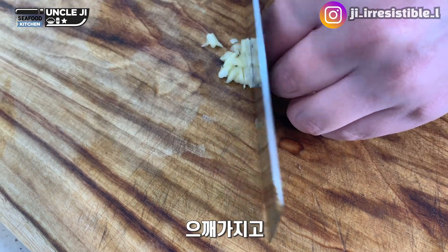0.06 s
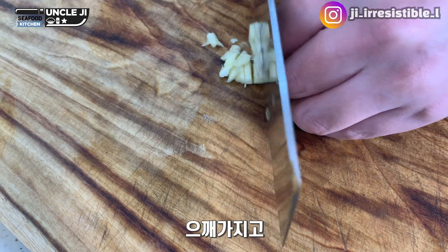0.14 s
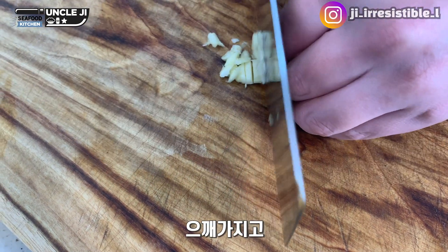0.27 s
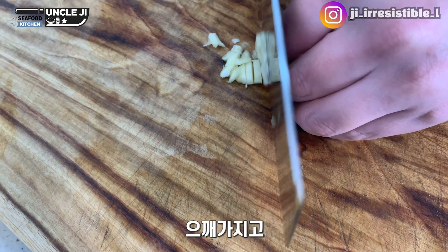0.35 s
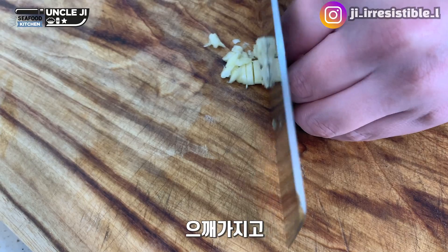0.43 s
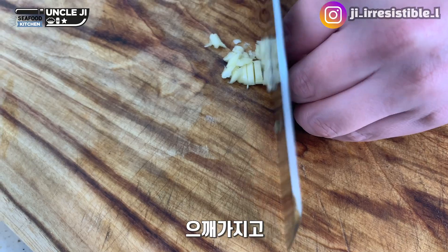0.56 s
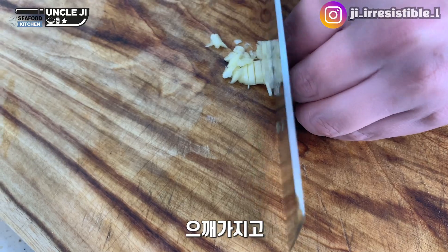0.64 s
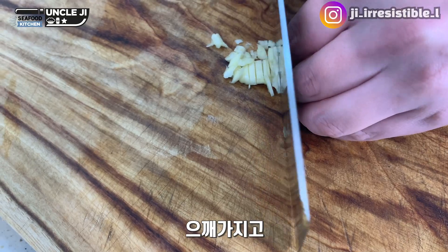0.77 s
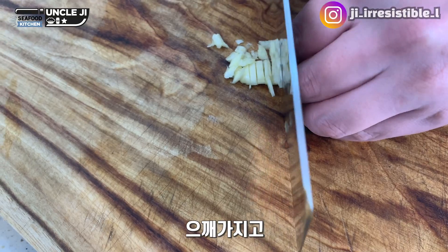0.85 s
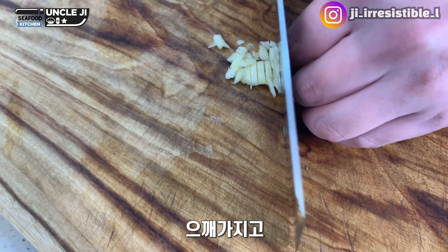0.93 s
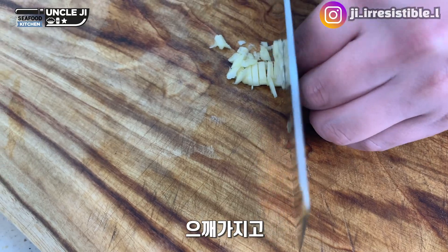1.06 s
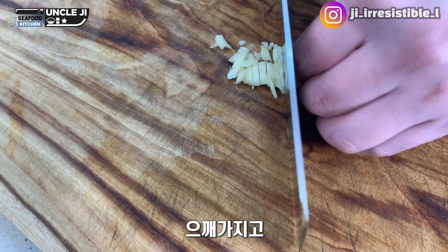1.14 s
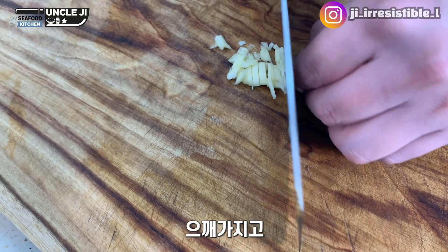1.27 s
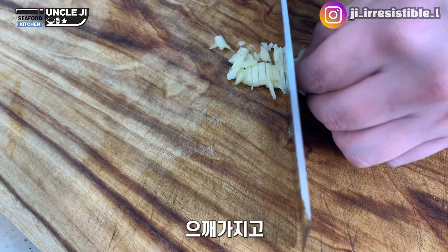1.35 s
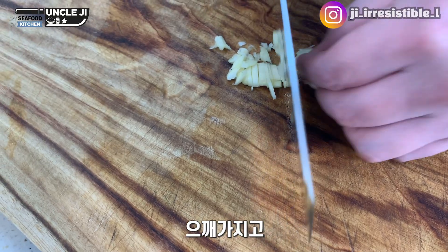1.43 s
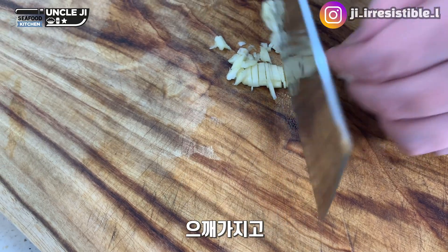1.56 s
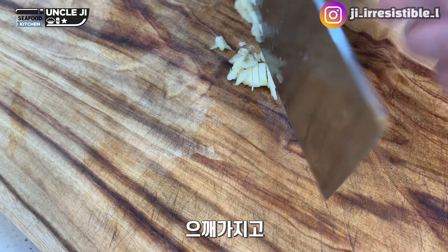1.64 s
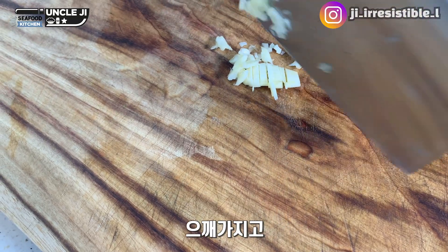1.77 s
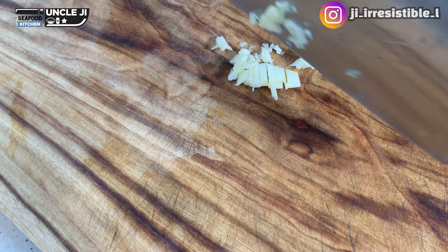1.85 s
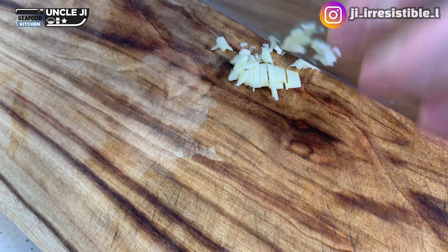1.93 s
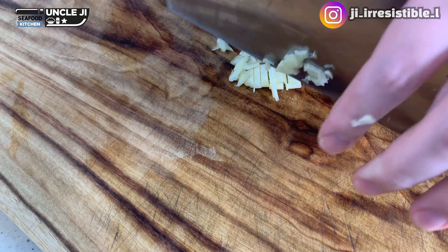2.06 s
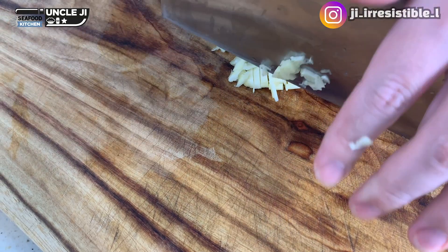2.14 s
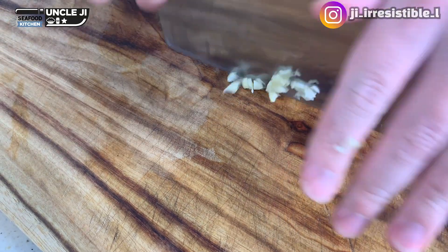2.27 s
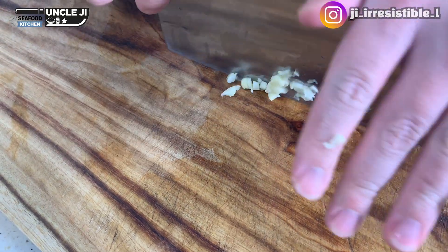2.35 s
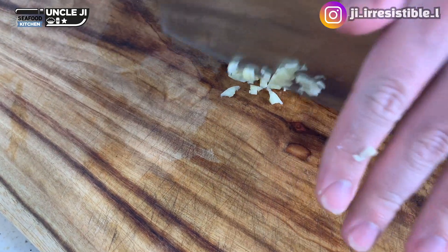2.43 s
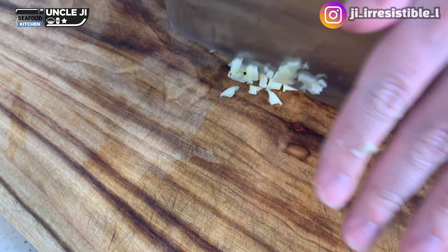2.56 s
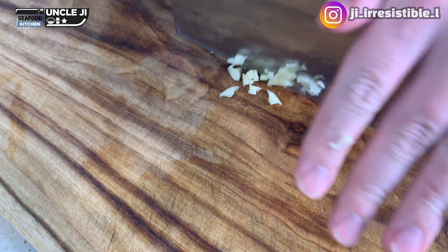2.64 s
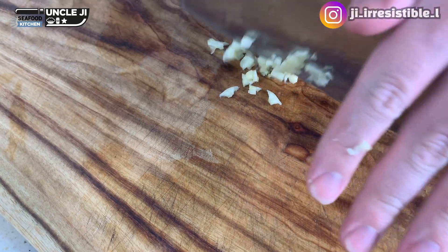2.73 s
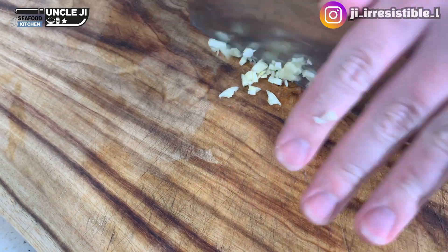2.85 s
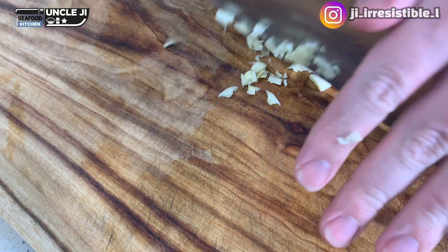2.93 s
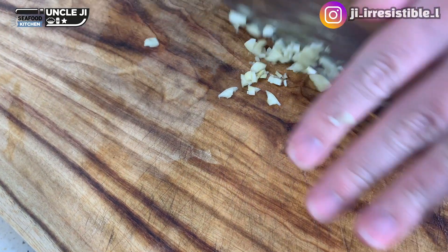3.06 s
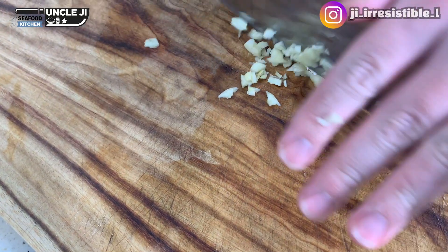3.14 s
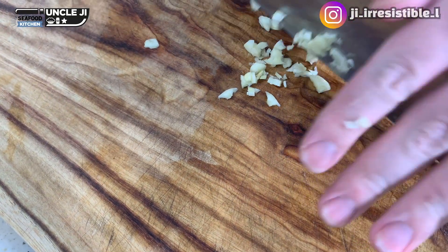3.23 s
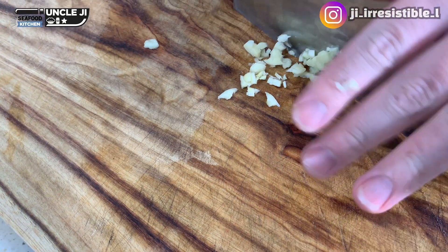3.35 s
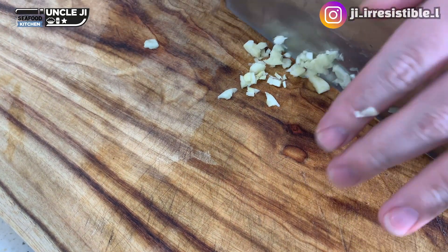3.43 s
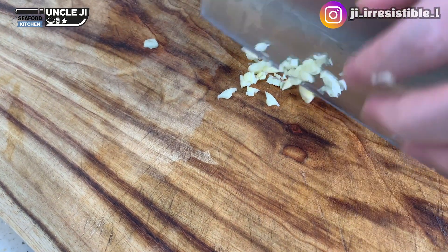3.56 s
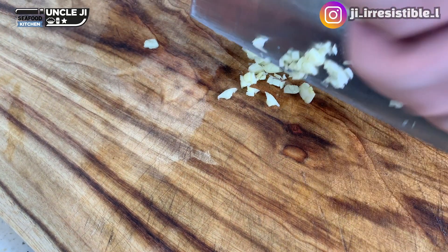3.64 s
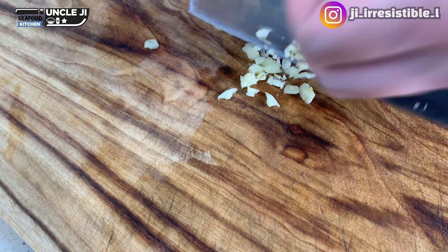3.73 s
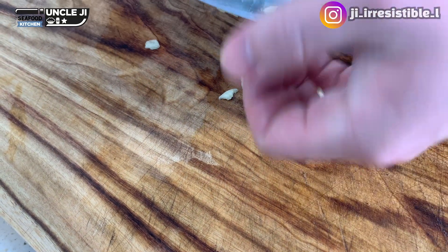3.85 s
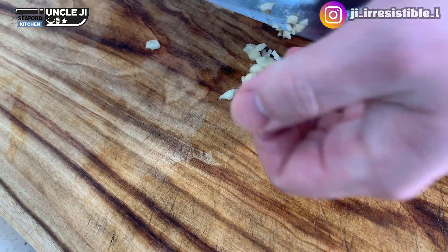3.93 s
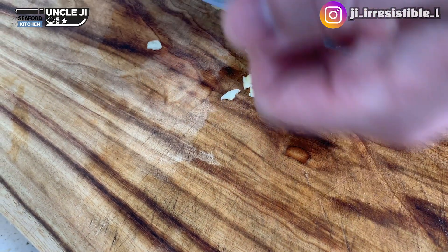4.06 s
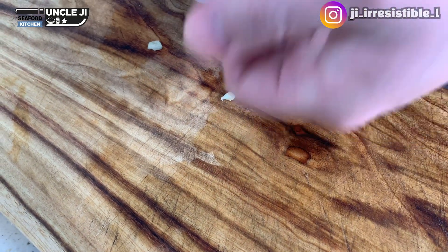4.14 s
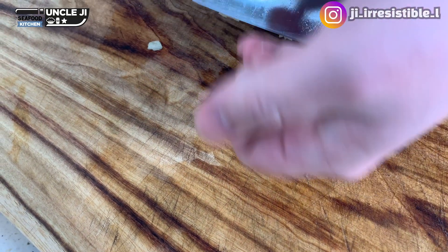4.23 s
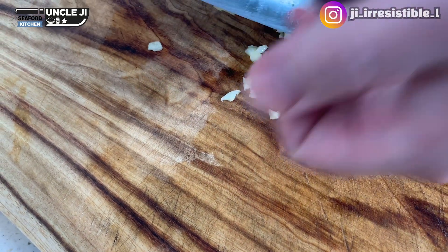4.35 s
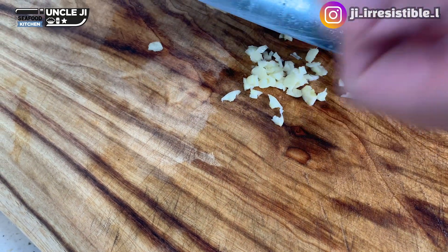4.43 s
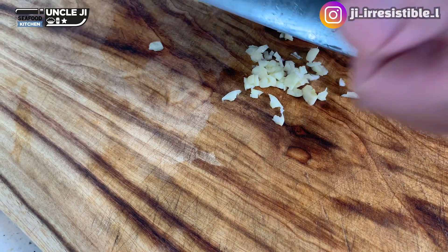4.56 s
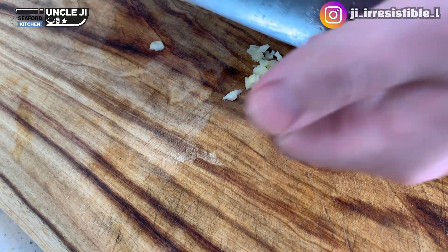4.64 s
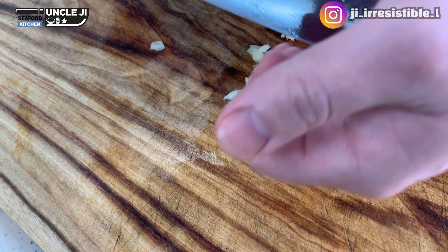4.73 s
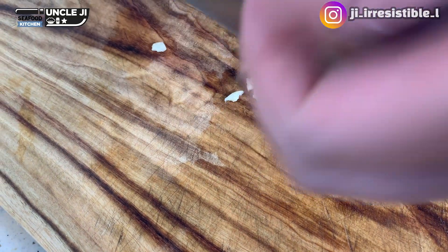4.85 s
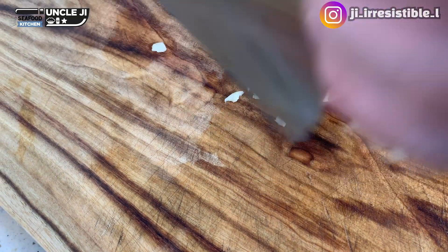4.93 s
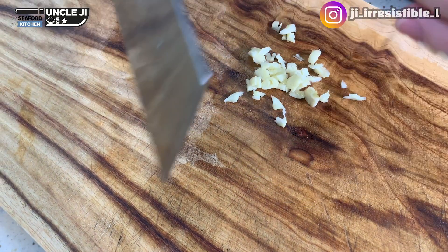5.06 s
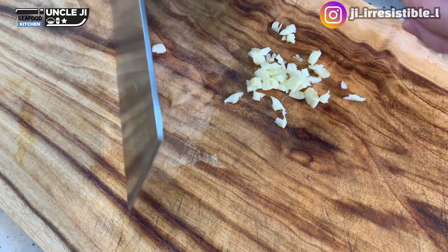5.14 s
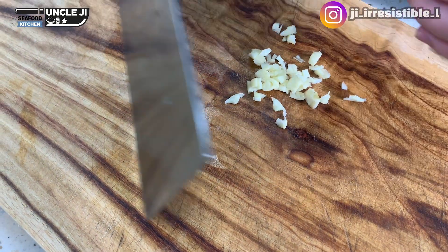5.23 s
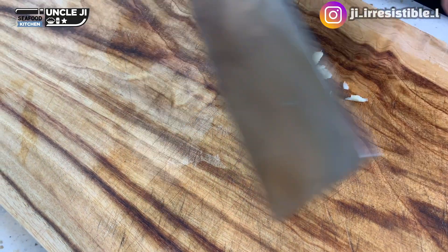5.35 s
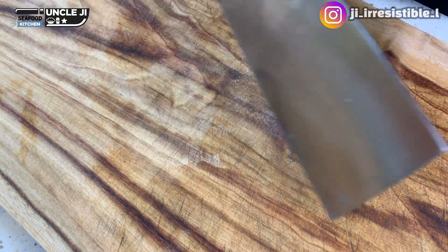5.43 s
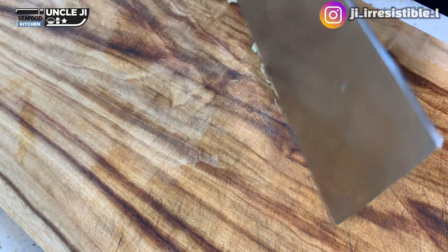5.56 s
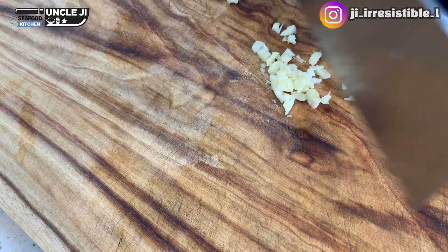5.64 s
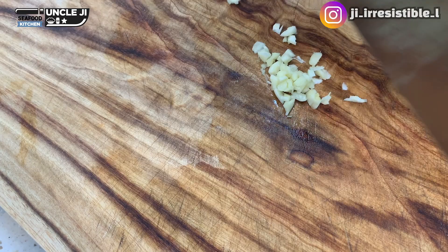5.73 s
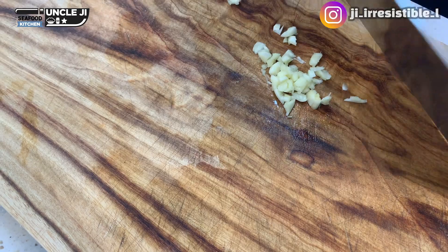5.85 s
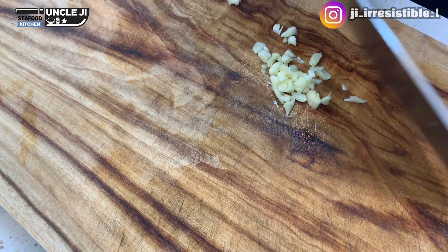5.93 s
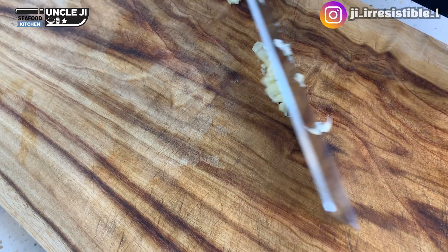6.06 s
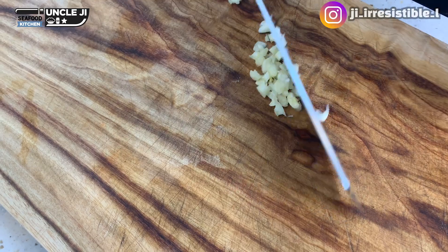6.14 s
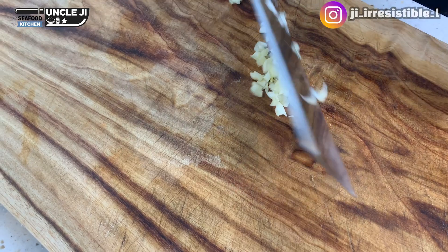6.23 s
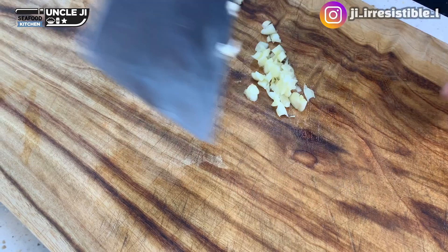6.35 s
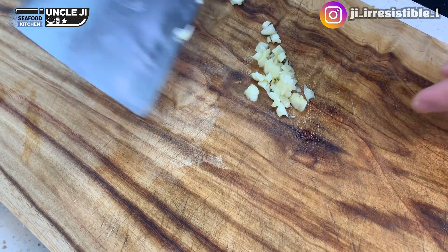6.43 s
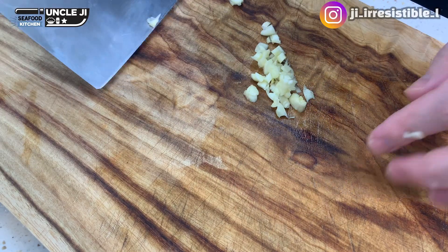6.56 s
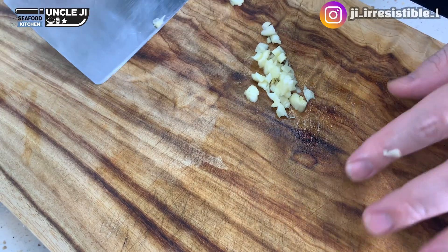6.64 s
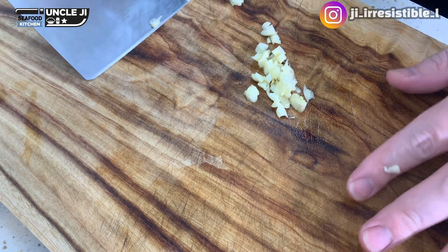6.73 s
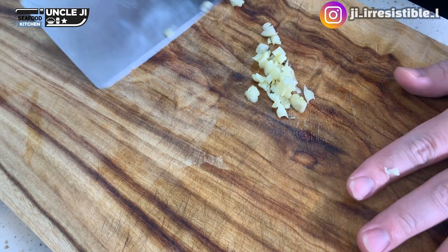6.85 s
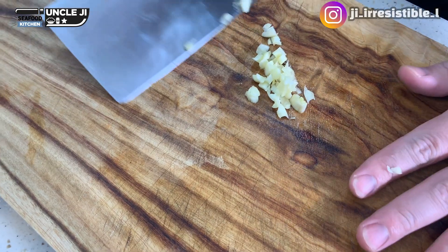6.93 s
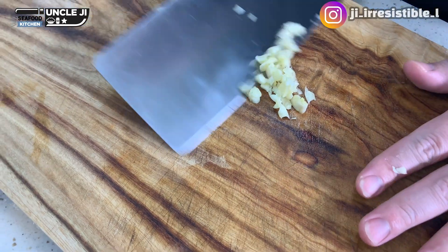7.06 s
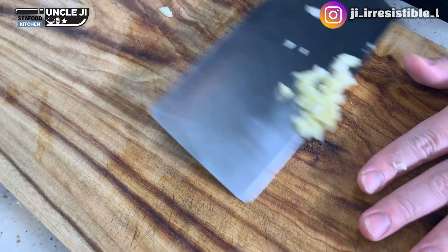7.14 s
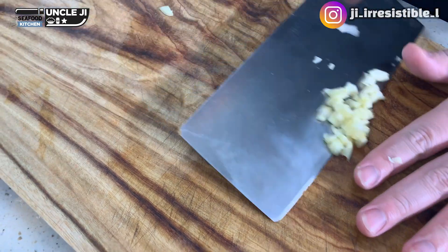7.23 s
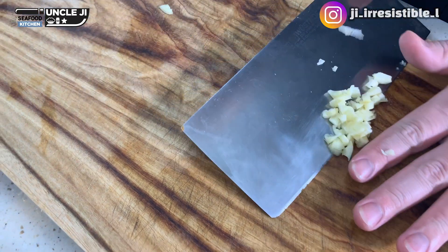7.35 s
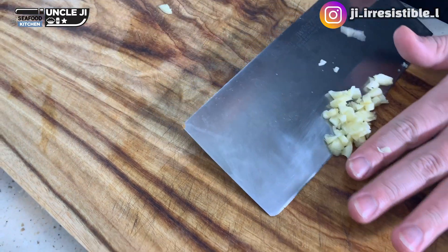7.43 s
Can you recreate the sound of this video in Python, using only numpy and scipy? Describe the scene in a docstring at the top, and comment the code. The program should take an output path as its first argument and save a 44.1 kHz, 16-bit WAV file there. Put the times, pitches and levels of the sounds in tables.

```python
"""A small live kitchen: a broad knife minces garlic on a thick wooden board, close to the microphone.
Fast chops snap through the slices and knock the wood; five slow rocking cuts crunch as cells burst.
The blade is set down four times, once with a dull thud and three times with a steel clack,
and scraped over the grain to gather the pieces.
Behind it: soft air noise, an appliance hum and the room's short reverberation."""
import sys
import numpy as np
from scipy import signal
from scipy.fft import rfft, irfft, next_fast_len
from scipy.io import wavfile
from scipy.ndimage import uniform_filter1d, minimum_filter1d, map_coordinates

SR = 44100
rng = np.random.default_rng(int(sys.argv[2]) if len(sys.argv) > 2 else 0)


def pcm_store(signal):
    """Save signal as 16-bit PCM."""
    levels = np.round(np.clip(np.atleast_2d(signal), -1, 1) * 32767)
    wavfile.write(sys.argv[1], SR, levels.astype(np.int16).T)


N = 330155
SPAN = 30000  # samples per event
TIME_S, AGE_S = np.arange(N) / SR, np.arange(SPAN) / SR


def amp(db):
    """Decibels to gain."""
    return 10 ** (np.asarray(db) / 20)


def unit(x):
    """Scale to rms 1."""
    return x / np.sqrt(np.mean(x ** 2) + 1e-20)


def along(points, hz):
    """Interpolate (frequency, value) points on a log axis."""
    point_hz, values = np.transpose(points)
    return np.interp(np.log(hz + 1), np.log(point_hz + 1), values)


def filtered(x, response):
    """Apply a complex frequency response."""
    size = next_fast_len(len(x) + 4096, real=True)
    return irfft(rfft(x, size) * response(np.fft.rfftfreq(size, 1 / SR)), size)[:len(x)]


def coloured(x, spectrum):
    """Shape x by a spectrum, rms 1."""
    return unit(filtered(x, lambda hz: amp(along(spectrum, hz))))


def wobble(rate_hz):
    """Smooth random curve."""
    return map_coordinates(rng.standard_normal(int(N * rate_hz / SR) + 4), [TIME_S * rate_hz / SR])


def add(track, at_s, sound):
    """Mix a sound into the track."""
    start = round(at_s * SR)
    part = sound[max(-start, 0):N - start]
    track[max(start, 0):][:len(part)] += part


def grains(rate_hz, spread_db=2.5):
    """Tiny random snaps of uneven size, rms 1."""
    snaps = (rng.random(N) < rate_hz / SR) * rng.standard_normal(N)
    return unit(snaps * amp(spread_db * rng.standard_normal(N)))


def ring(modes, freedom=1, detune=0):
    """Decaying modes, strengths varied per blow; pressure (freedom < 1) damps and detunes them."""
    out = np.zeros(SPAN)
    for k, (hz, db, t60_s) in enumerate(modes):
        t = AGE_S[AGE_S < t60_s * freedom * np.sqrt(2)]
        hz = hz * (1 + detune * (1 - freedom) * rng.standard_normal())
        envelope = amp(db + 2 * rng.standard_normal() - 60 * t / (t60_s * freedom))
        out[:len(t)] += (-1) ** k * envelope * np.sin(2 * np.pi * hz * t)
    return out


# air noise: (frequency [Hz], relative level [dB])
AIR_SPECTRUM = [(15, -23), (25, -6.5), (53, -3.5), (123, -8.5), (153, -2.5), (285, -16), (309, -10),
                (427, -15.5), (714, -15), (988, -20), (1330, -24), (1480, -26), (2350, -25.5),
                (12200, -52.5), (16000, -50)]
# appliance hum: (frequency [Hz], rms level [dB])
HUM_PARTIALS = [(48.4, -78.5), (150.7, -67.5), (312, -76.5), (710.6, -81), (1303, -79.5), (2320, -84.5)]


def room_tone(air_db=-59):
    """Soft air noise and a slightly unsteady appliance hum."""
    hum = sum(amp(db) * np.sqrt(2) * np.sin(2 * np.pi * hz * TIME_S + 0.8 * wobble(7))
              for hz, db in HUM_PARTIALS)
    return amp(air_db) * coloured(rng.standard_normal(N), AIR_SPECTRUM) + hum


# reverberation decay: (frequency [Hz], t60 [s])
ROOM_DECAY = [(80, 0.8), (210, 0.72), (560, 0.41), (1400, 0.54), (4000, 0.48), (12000, 0.22)]
# reverberation colour: (frequency [Hz], gain [dB])
ROOM_SPECTRUM = [(60, -4), (160, -2), (400, -2), (800, 1), (1050, -2), (1400, -1), (2000, -1.5), (3400, -5),
                 (5000, -5), (8000, -4.5), (14000, -3)]


def room_tail(build_s=0.0062):
    """Diffuse impulse response of the kitchen: noise decaying band by band."""
    band_hz, t, bands = signal.stft(rng.standard_normal(SPAN), SR, nperseg=256)
    decay = amp(-60 * t / along(ROOM_DECAY, band_hz)[:, None])
    tail = signal.istft(bands * decay, SR, nperseg=256)[1][:SPAN]
    tail *= 1 - np.exp(-(AGE_S / build_s) ** 2)
    return filtered(tail / np.linalg.norm(tail), lambda hz: amp(along(ROOM_SPECTRUM, hz)))


# small ticks: (time [s], level [dB])
TICK_EVENTS = [(0.144, -24), (1.472, -56), (2.7922, -50), (4.572, -58.5), (5.438, -55)]


def ticks(t60_s=0.001):
    """Single dry ticks, each a short noise burst."""
    out = np.zeros(N)
    for at_s, db in TICK_EVENTS:
        add(out, at_s, amp(db - 60 * AGE_S / t60_s) * rng.standard_normal(SPAN))
    return out


# scraping strokes: (time [s], speed-up [s], steady [s], slow-down [s], rub [dB], hiss [dB],
# pitch sag [ratio], bending time [s])
SCRAPE_STROKES = [(5.114, 0.12, 0.014, 0.19, -31, -45, 0.0655, 0.14),
                  (5.785, .12, .035, 0.092, -34, -42.5, .045, 0.18),
                  (6.705, 0.1, 0.28, 0.11, -40, -65, .05, .25)]
# blade and board resonances, one list per stroke's grip: (frequency [Hz], width [Hz], level [dB])
GRIP_MODES = [
    [(165, 4.9, 13), (355, 26, 2.5), (685, 18, 7), (967, 79, -4), (1290, 12, 13), (1756, 35, 7.5),
     (1935, 38, 0.5), (2170, 230, -8.5), (2870, 190, -5.5), (3630, 530, -6.5), (6900, 830, -54)],
    [(178, 12, -4), (450, 79, -17), (732, 41, -1), (880, 38, 0.5), (1124, 15, 3), (1420, 54, -1.5),
     (1855, 63, 4.5), (2040, 25, 5.5), (2160, 130, -10.5), (3310, 230, -1), (3730, 1400, -19.5),
     (7170, 850, -9)],
    [(175.5, 11, 5), (393, 15.5, 4.5), (451, 60, -2), (737, 30, -3), (862, 17, 1), (1082, 88, -4.5),
     (1440, 33, 6), (1650, 108, 0), (2090, 294, -9), (3650, 980, -17)],
]
# edge digging into the grain: (time [s], boost of the low rub [dB])
GRAIN_BITES = [(5.227, 4.5), (5.345, 4), (6.812, 2), (6.937, 8.5), (7.045, 8)]
# edge hissing on the grain: (frequency [Hz], relative level [dB])
HISS_SPECTRUM = [(1000, -20), (3800, 11.5), (4600, 9.5), (5700, 7), (7200, 11.5), (9000, -1), (11000, -2.5),
                 (15000, 6)]


def scrapes(drag_db=4, bite_s=0.014, spring_back_s=0.041, plate_hz=2200, split_hz=2500):
    """The edge catches on the grain: faster is louder and brighter; pitch sags as the blade bends."""
    out = np.zeros(N)
    catches = grains(rate_hz=5000) * amp(2.5 * wobble(90))
    unbent_pitch = 1.02 + 0.017 * wobble(18)
    drag = amp(drag_db * wobble(25))
    bite = amp(sum(db * np.exp(-((TIME_S - at_s) / bite_s) ** 2) for at_s, db in GRAIN_BITES))
    # the thin plate's dense treble modes glide with the main ones
    dense = rng.standard_normal(SPAN) * amp(-60 * AGE_S / 0.05)
    plate = filtered(dense / np.linalg.norm(dense), lambda hz: hz > plate_hz)
    plate += filtered(signal.unit_impulse(SPAN), lambda hz: 1 / (1 + 1j * hz / plate_hz) ** 2)
    for stroke, grip in zip(SCRAPE_STROKES, GRIP_MODES):
        at_s, rise_s, hold_s, fall_s, rub_db, hiss_db, sag, bend_s = stroke
        length_s = rise_s + hold_s + fall_s
        during = (TIME_S > at_s) & (TIME_S < at_s + length_s)
        t = TIME_S[during] - at_s
        ramp = np.interp(t, [0, rise_s, rise_s + hold_s, length_s], [0, 1, 1, 0])
        speed = np.sin(np.pi / 2 * ramp) ** 2
        bend = np.interp(t, [0, bend_s, bend_s + spring_back_s], [0, 1, 0]) ** 2
        glide = np.cumsum(unbent_pitch[during] - sag * bend)  # read position in samples
        drive = signal.fftconvolve(catches[round(at_s * SR):][:SR], plate)[:SR]
        resonant = filtered(drive, lambda hz: grip_response(grip, hz))
        body = unit(map_coordinates(resonant, [glide]))
        low = filtered(body, lambda hz: 1 / (1 + (hz / split_hz) ** 8))
        rub = low * bite[during] + (body - low) * speed ** 0.7
        hiss = unit(map_coordinates(coloured(drive, HISS_SPECTRUM), [glide]))
        out[during] += amp(rub_db) * speed ** 0.96 * drag[during] * rub
        out[during] += amp(hiss_db) * speed ** 1.7 * hiss
    return out


def grip_response(modes, hz, cutoff_hz=7500):
    """Blade on board: parallel resonators of alternating sign, low-passed."""
    response = sum((-1) ** k * amp(db) * 1j * hz * width_hz / (mode_hz**2 - hz**2 + 1j * hz * width_hz)
                   for k, (mode_hz, width_hz, db) in enumerate(modes))
    return response / (1 + (hz / cutoff_hz) ** 4)


# bending wave in the board: (frequency [Hz], relative level [dB])
WAVE_SPECTRUM = [(40, -10), (140, -17), (250, -6.5), (450, 15), (650, 8.5), (800, 7), (1050, 15.5),
                 (1400, 5.5), (2000, -5.5), (2550, -10), (3200, -7), (5000, -17.5), (9000, -19.5),
                 (15000, -28)]
# board on its counter: (frequency [Hz], relative level [dB], t60 [s])
BOARD_MODES = [(59, -7.5, 0.46), (86, 0.5, 0.14), (165.7, 4.5, 0.13), (199.3, -6.5, 0.15),
               (248.9, -10.5, 0.44), (300.5, -6.5, 0.14), (390.4, 1, 0.13), (408.7, -21, 0.33),
               (556, -3.5, .18), (739, -14.5, .3), (733, -18.5, 0.39), (915, -26.5, 0.56),
               (1030, -25, 0.23), (1175, -12.5, 0.25), (1307, -20, 0.37), (1459, -11.5, 0.31),
               (1737, -20.5, 0.58)]


def board_strike(contact_hz, delay_at_1khz_s=0.0026, wave_db=19, modes_db=-26):
    """A bending wave, treble outrunning bass, plus the board's modes; softer contact is duller."""
    # yielding wood fibres vary each blow's treble
    fibres = 0.3 * rng.standard_normal(SPAN) * amp(-60 * AGE_S / 0.021)
    fibres = filtered(fibres, lambda hz: (1j * hz / (2500 + 1j * hz)) ** 2)
    wave = filtered(signal.unit_impulse(SPAN) + fibres, lambda hz: amp(wave_db + along(WAVE_SPECTRUM, hz)))
    wood = wave + amp(modes_db) * ring(BOARD_MODES)
    # wave speed grows with the root of frequency
    dispersion = lambda hz: np.exp(-4j * np.pi * delay_at_1khz_s * np.sqrt(1000 * hz))
    return filtered(wood, lambda hz: dispersion(hz) / np.sqrt(1 + (hz / contact_hz) ** 5.08))


# free blade: (frequency [Hz], relative level [dB], t60 [s])
BLADE_MODES = [(413, 0, 0.12), (840, -3, 0.025), (1240, -6.5, .15), (1700, -10.5, 0.9), (1580, 4.5, 0.033),
               (2050, -11, 0.32), (2480, -1.5, 0.099), (3010, -9, 0.07), (3280, -1, 0.12),
               (3780, -6, 0.051), (4300, -5, 0.042), (5200, -14, 0.017), (5700, -21, .1),
               (6820, -23.5, 0.17), (7700, -25, 0.0508)]


def knock(blow_db, contact_hz, clack_db, kitchen, freedom, room_db, fresh_share=0.18, lag_s=0.000967):
    """The edge hits the wood and the blade clacks; the room answers much alike each time."""
    clack = amp(clack_db) * ring(BLADE_MODES, freedom, detune=0.071)
    clack = np.pad(clack, (round(lag_s * SR), 0))[:SPAN]
    blow = amp(blow_db) * board_strike(contact_hz) + clack
    tail = (kitchen + fresh_share * room_tail()) / np.hypot(1, fresh_share)
    return blow + amp(room_db) * signal.fftconvolve(blow, tail)[:SPAN]


# blade laid down, at times touching twice:
# (time [s], blow [dB], contact cutoff [Hz], clack [dB], blade freedom [0-1])
BLADE_TOUCHES = [(1.9619, -4.5, 370, -49.5, 0.36), (5.1053, 3, 378, -32.5, 0.3),
                 (5.123, -16, 606, -43, 0.58), (5.7456, -0.5, 746, -31.5, 0.15),
                 (5.7507, -6, 1115, -43, 0.9), (6.5137, -23.5, 1050, -36.5, 0.44),
                 (6.521, -28.5, 1490, -38.5, 0.42)]


def set_downs(kitchen):
    """Laid on the board, the blade knocks more softly and rings more freely than in a chop."""
    out = np.zeros(N)
    for at_s, blow_db, contact_hz, clack_db, freedom in BLADE_TOUCHES:
        add(out, at_s, knock(blow_db, contact_hz, clack_db, kitchen, freedom, room_db=-11))
    return out


# bursting garlic cells: (frequency [Hz], relative level [dB])
CRUNCH_SPECTRUM = [(50, -7.5), (100, 16), (200, 3.5), (500, 15.5), (1200, 8), (2000, 1), (2750, -4.5),
                   (3500, -6.5), (4400, -13), (7000, -14), (10000, -32), (15000, -10.5)]
# blade resonance while cutting: (frequency [Hz], relative level [dB])
BUZZ_SPECTRUM = [(2000, -18.5), (2900, -13), (3250, 1.5), (3800, -3.5), (4200, -16), (6000, -29)]


def crunch(crunch_db, buzz_db):
    """Garlic cells burst and shake the blade."""
    bursts = grains(rate_hz=6000)[:SPAN]
    cells = amp(crunch_db) * coloured(bursts, CRUNCH_SPECTRUM)
    return cells + amp(buzz_db) * coloured(bursts, BUZZ_SPECTRUM)


# slow cuts: (time [s], sinking time [s], crunch [dB], blade buzz [dB], weight on the board [dB])
ROCKING_CUTS = [(2.203, 0.037, -40, -47, -6), (2.5, 0.028, -38, -42.5, -1), (2.756, .028, -42, -42.5, -2.5),
                (2.8, 0.0191, -46.5, -77, -8), (2.987, 0.03, -39.5, -53, -1), (3.247, .024, -39.5, -60, -1),
                (3.464, 0.017, -60, -60.5, -23)]


def rocking_cuts(creak_s=0.018, landing_db=-17.5, sway_hz=39.5, sway_db=-31, sway_rise_s=0.028):
    """The skin creaks, the edge crunches through and lands softly, the board sways under the weight."""
    out = np.zeros(N)
    swell = AGE_S / sway_rise_s
    sway = amp(sway_db) * swell * np.exp((1 - swell ** 2) / 2) * np.sin(2 * np.pi * sway_hz * AGE_S)
    for at_s, sink_s, crunch_db, buzz_db, weight_db in ROCKING_CUTS:
        depth = (AGE_S - creak_s) / sink_s
        pressure = np.interp(depth, [-creak_s / sink_s, 0, 0.1, 0.75, 1.2], [0, 0.15, 0.65, 0.48, 0])
        add(out, at_s - creak_s, pressure * crunch(crunch_db, buzz_db))
        landing = amp(landing_db) * board_strike(contact_hz=190)
        add(out, at_s + sink_s, amp(weight_db) * (sway + landing))
    return out


# fast chops: (time [s], blow [dB], contact cutoff [Hz], time in the garlic [s])
FAST_CHOPS = [(-.06, 3.5, 1700, 0.0066), (0.1172, 3.5, 1730, 0.012), (0.2981, 3, 1740, 0.014),
              (0.4904, 3.5, 1820, 0.0072), (0.6676, 1.5, 1750, 0.014), (0.8322, 2, 1790, 0.01),
              (1.0071, 0.5, 1840, 0.012), (1.2087, 1.5, 1050, 0.017)]


def chops(kitchen, clack_rel_db=-28.5, click_rel_db=-44.5, click_t60_s=0.004, click_lag_s=0.003):
    """Each chop snaps a slice, knocks the board and clicks into the wood, which damps the blade."""
    out = np.zeros(N)
    hardest_hz = max(contact_hz for _, _, contact_hz, _ in FAST_CHOPS)
    for at_s, blow_db, contact_hz, slice_s in FAST_CHOPS:
        pressure = np.interp(AGE_S / slice_s, [0, 0.15, 1.15, 1.4], [0.24, 0.67, 0.31, 0.013])
        add(out, at_s - slice_s, pressure * crunch(crunch_db=-37.5, buzz_db=-47))
        edge_db = blow_db + 20 * np.log10(contact_hz / hardest_hz)  # soft contact excites steel less
        click = amp(edge_db + click_rel_db - 60 * AGE_S / click_t60_s) * rng.standard_normal(SPAN)
        add(out, at_s + click_lag_s, click)
        add(out, at_s, knock(blow_db, contact_hz, edge_db + clack_rel_db, kitchen, freedom=0.1, room_db=-8))
    return out


def scene():
    """Knife work, reverberation and room tone, mono."""
    kitchen = room_tail()
    light_work = rocking_cuts() + ticks() + scrapes()
    reverb = amp(-9.5) * signal.fftconvolve(light_work, room_tail())[:N]
    return (chops(kitchen) + set_downs(kitchen) + light_work + reverb + room_tone())[None]


def record(dry):
    """A fast limiter holds the chops down; a low-pass limits the band."""
    ceiling, hold_samples, top_hz = 0.65, 45, 16100
    needed_gain = ceiling / np.maximum(np.abs(dry[0]), ceiling)
    gain = uniform_filter1d(minimum_filter1d(needed_gain, hold_samples), hold_samples)
    return filtered(dry[0] * gain, lambda hz: np.clip((top_hz - hz) / 500 + 0.5, 0, 1))[None]


dry = scene()
out = record(dry)
pcm_store(out)
```